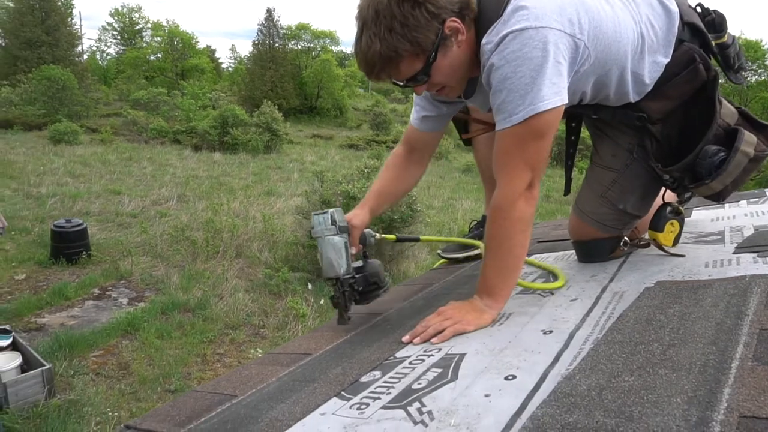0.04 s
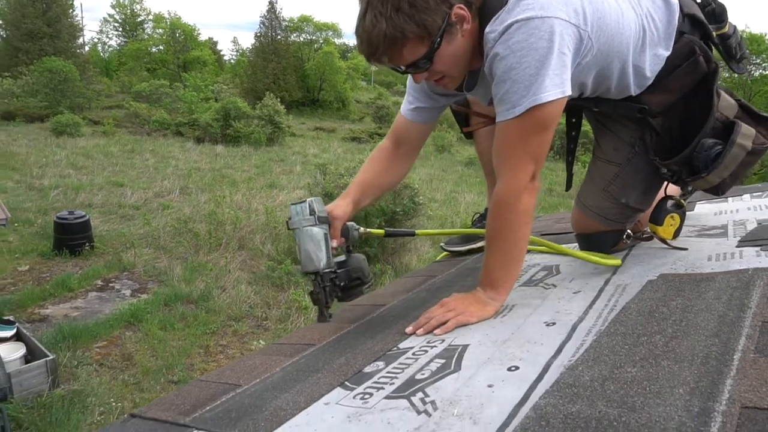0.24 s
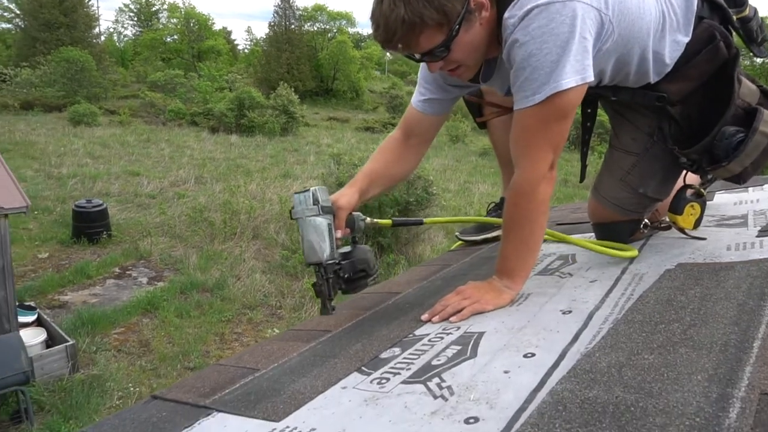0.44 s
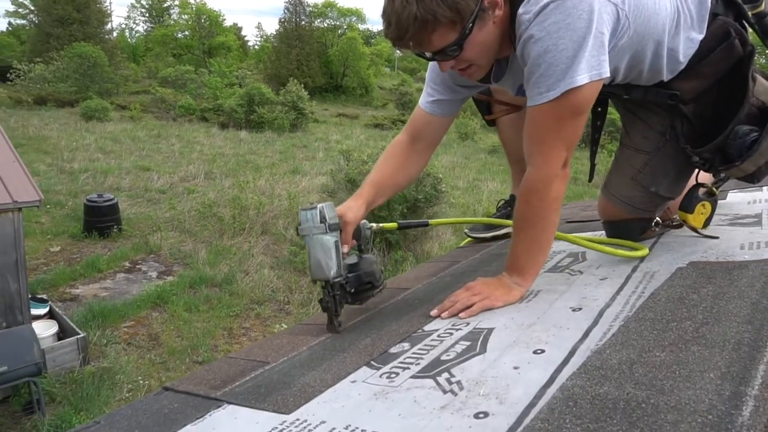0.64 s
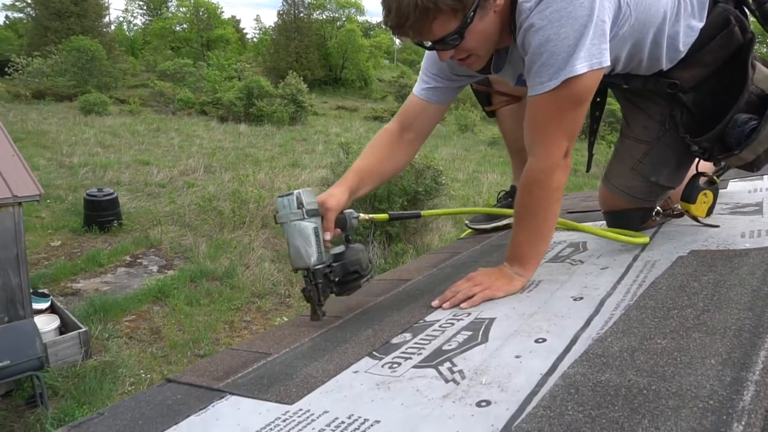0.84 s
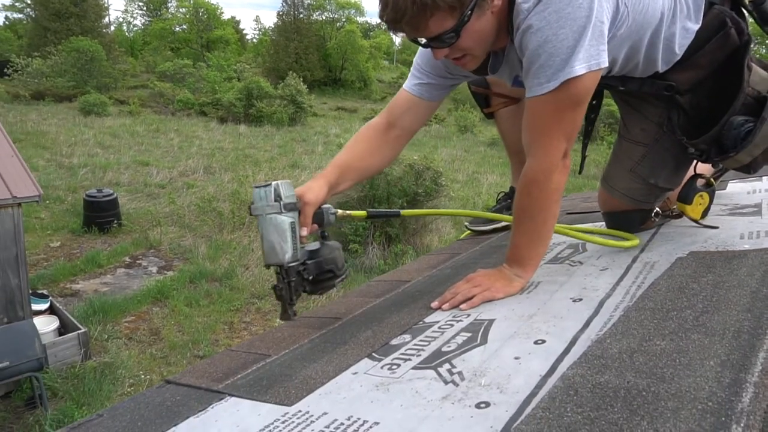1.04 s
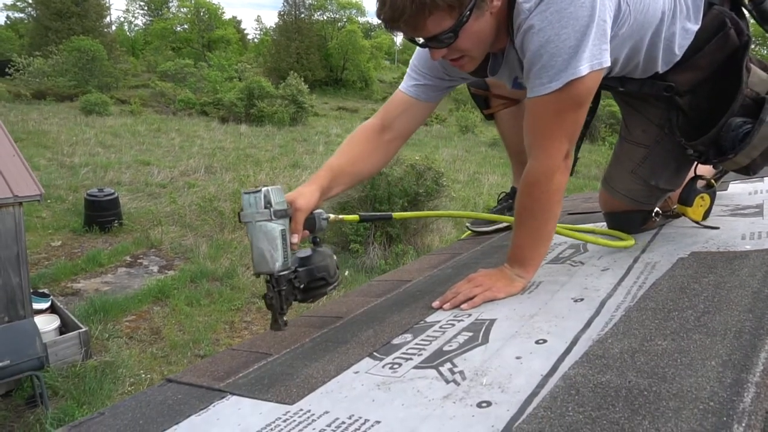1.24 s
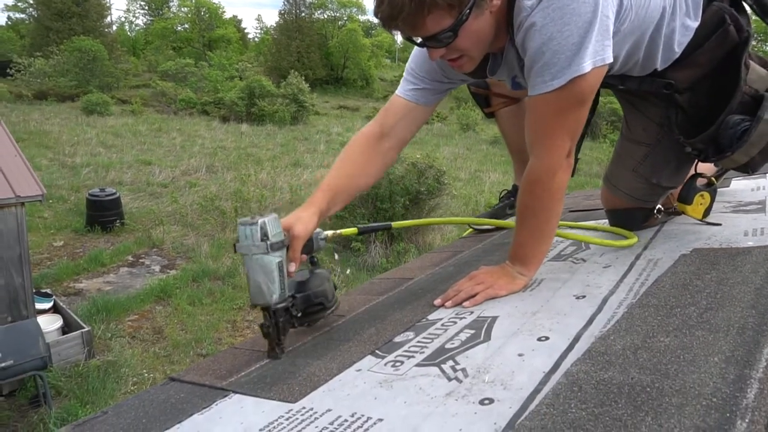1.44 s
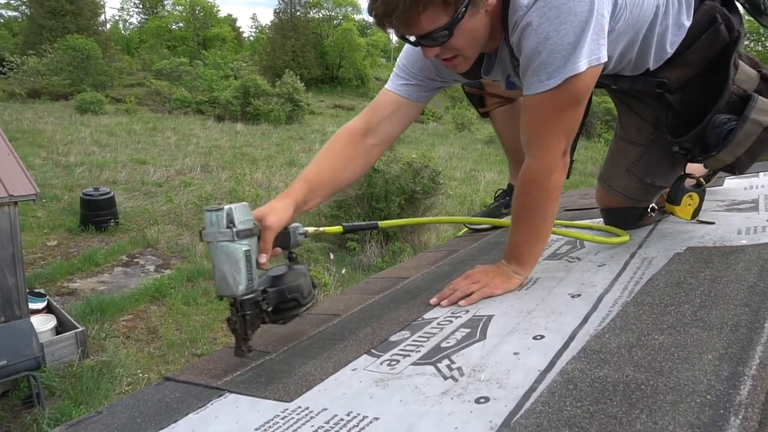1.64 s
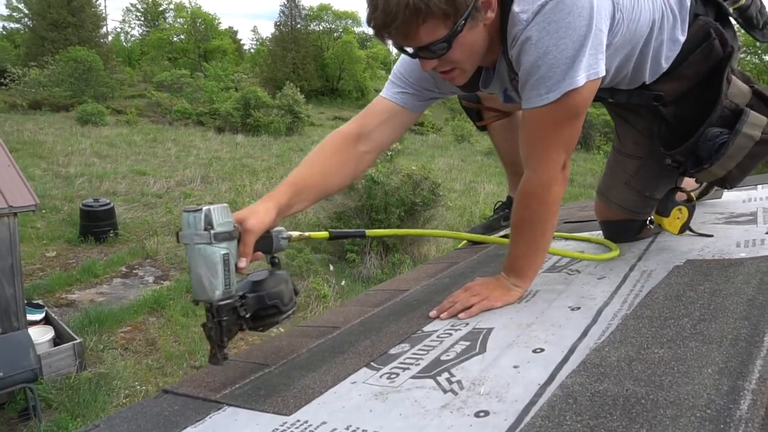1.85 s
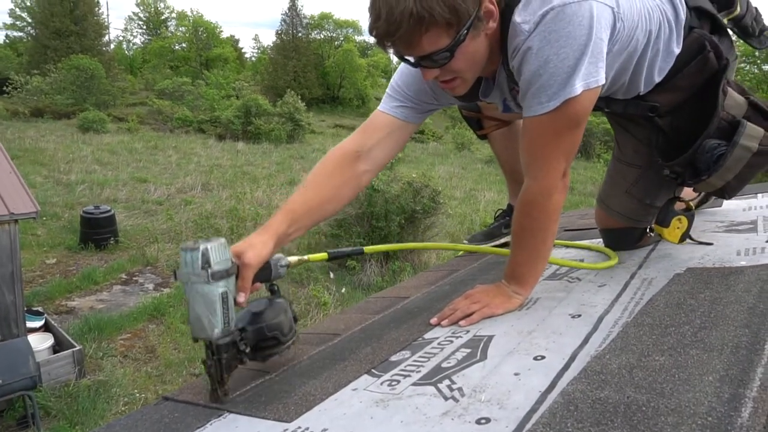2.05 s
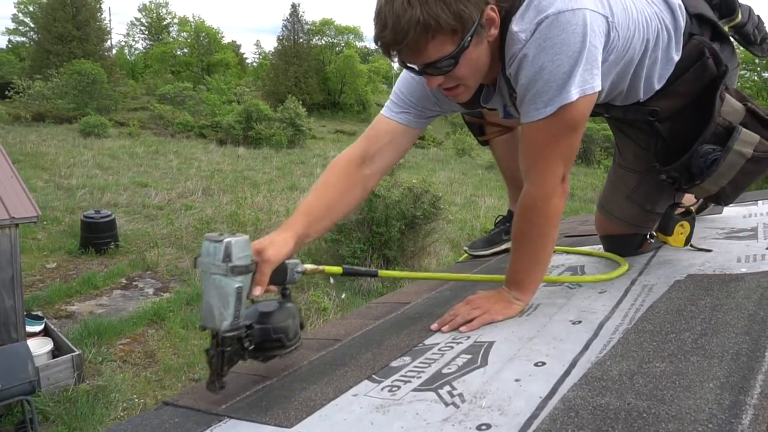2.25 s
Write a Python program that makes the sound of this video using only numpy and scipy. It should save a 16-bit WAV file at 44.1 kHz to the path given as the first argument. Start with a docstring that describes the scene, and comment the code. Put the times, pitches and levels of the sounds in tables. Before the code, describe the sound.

A pneumatic nail gun works close by on an outdoor roof. It opens on the exhaust hiss of a shot just fired, then a brief gritty scrape with soft bumps around 0.2 seconds. Sharp, clacking bangs land at about 0.8, 1.5 and 2.2 seconds, each followed by a short air hiss. Wind rumbles from 1 to 1.5 seconds, small clicks come near 1.3, and a distant motor hums faintly.

```python
"""Coil nailer on a roof

A pneumatic nailer tacks shingles to a wooden deck, close up and outdoors. Each shot is a trigger tick,
the nose's thud, air into the cylinder, a steel clack and a nail blow that overloads the microphone;
then the piston returns with a spit of air and the exhaust hiss swells and falls. Between shots come
a scrape, soft bumps, grit and small clicks, over wind and a distant motor."""
import sys
import numpy as np
from scipy import signal
from scipy.fft import rfft, irfft, next_fast_len
from scipy.io import wavfile
from scipy.ndimage import uniform_filter1d

SR = 44100
rng = np.random.default_rng(int(sys.argv[2]) if len(sys.argv) > 2 else 0)


def digitize_waveform(pressure):
    """Quantize a signal to 16-bit integers and store it at the path in sys.argv[1].

    Rows of a 2-D input are taken as channels; values are limited to [-1, 1].
    """
    field = np.atleast_2d(pressure).T
    bounded = np.clip(field, -1, 1)
    quanta = np.round(bounded * 32767).astype(np.int16)
    wavfile.write(sys.argv[1], SR, quanta)


N = 101297
T = np.arange(N) / SR

# The shots. Each row: time of the blow in seconds, piston return in seconds after it, knock pitch in Hz,
# trims in dB for blow, steel ring, deck and exhaust, nose thud pitch in Hz, nose thud level in dB.
SHOTS = [(-.06, 0.04, 1140, 0, -1, -11, 2, 212, -20), (0.7555, 0.023, 924, -3, -25, 0, 0.5, 293, -9),
         (1.5339, .0277, 1462, -6.5, 4, -5, 2, 251, -21.5),
         (2.150, 0.024, 1380, -6, 1.5, -2.5, 0, 117, -16)]
# Modes of the steel driver and the roof deck. Each row: pitch in Hz, level in dB, T60 in seconds.
DRIVER_MODES = [(5060, -3.5, 0.014)]
DECK_MODES = [(76.46, -18, 0.83), (183.5, -24.5, 0.86), (228.4, -27, 0.67), (297, -17, 0.091),
              (430, -40, 0.39), (567, -25.5, 0.26), (816, -12.5, 0.083)]
# EQ curves for the noise layers. Each row: frequency in Hz, relative level in dB.
BLOW_EQ = [(100, -2), (300, -2), (800, 0), (2400, -7.5), (4000, -10), (16000, -23)]
VALVE_EQ = [(40, -52), (120, 8), (400, 1), (850, 0.5), (2000, -7.5), (6500, -11.5), (8700, -5),
            (10300, -26), (13400, -8), (16000, -30)]
CLACK_EQ = [(200, -3), (8600, -11), (11000, -15.5), (16000, -36)]
RATTLE_EQ = [(350, 4), (1170, -12.5), (1870, -1.5), (2930, -14), (3940, -7), (6000, -7), (9000, -11),
             (10500, -16)]
SPIT_EQ = [(100, -14), (250, 5), (1140, -17.5), (1940, -3.5), (2860, -11), (4120, -0.5), (6600, -5.5),
           (8740, 3), (9750, -6), (14000, -3.5), (16000, -10.5)]
HISS_EQ = [(30, -40), (80, 5), (250, -3.5), (370, -1), (553, -11.5), (790, -4), (1110, -13.5),
           (2900, -14.5), (4100, -11), (6900, -13), (8700, -7.5), (10300, -22), (13300, -16), (16000, -28)]
CLICK_EQ = [(600, -21), (1300, -2), (2100, -3), (2500, 8), (3000, -8.5), (8000, -17.5), (12000, -28)]
GRIT_EQ = [(300, -5), (4500, 0.5), (8500, 2), (10300, -4.5), (15000, -11.5)]
BUMP_EQ = [(20, 2), (90, -3.5), (300, -5), (1500, -61)]
WIND_EQ = [(3, 6), (14, -3), (40, -16.5), (160, -44), (2000, -100)]
FIELD_EQ = [(40, -13.5), (104, -1.5), (135, -14), (330, -17), (700, -21), (1500, -23), (3000, -30),
            (9000, -36), (10600, -56), (13800, -40), (16000, -71)]
# Whistles of the exhaust port. Each row: start in seconds, length in seconds, pitch in Hz, level in dB.
PORT_WHISTLES = [(2.242, 0.025, 2450, -25.5), (2.275, 0.0066, 2520, -21.5)]
# Decay of the yard's echo. Each row: frequency in Hz, T60 in seconds.
YARD_DECAY = [(150, 0.61), (400, 0.47), (1400, 0.71), (4000, 0.4), (12000, 0.26)]
# Knees and hands on the deck. Each row: start in seconds, level in dB.
DECK_BUMPS = [(0.156, -23.5), (0.194, -28), (0.236, -24), (1.176, -31)]
# Clicks of the trigger and nose. Each row: start in seconds, level in dB, decay in seconds.
TOOL_CLICKS = [(1.2426, -31, 0.00096), (1.2532, -35.5, 0.0013), (1.2735, -32.5, 0.0022),
               (1.28, -37.5, 0.00099), (1.2838, -25.5, 0.0015), (1.9781, -28.5, 0.002)]
# Fader moves for the gritty rustle and the wind. Each row: time in seconds, level in dB.
RUSTLE_FADER = [(.3, -54), (.62, -61.5), (.97, -51), (1.19, -52.5), (1.33, -64), (1.84, -51), (2.1, -59.5)]
WIND_FADER = [(0, -23), (.6, -30), (1.02, -14), (1.18, -12.5), (1.32, -2.5), (1.39, -16), (1.46, -7.5),
              (1.6, -24.5), (2.3, -22.5)]
# Tones of the distant motor. Each row: pitch in Hz, starting level in dB, fade in dB per second.
MOTOR_TONES = [(102, -49, 0), (678, -50, 10)]

TRIGGER_LEAD_S, VALVE_LEAD_S, CLACK_LEAD_S, NAIL_LEAD_S = .0285, .024, .0088, .002  # ahead of the blow
SWELL_END_S, FALL_FROM_S, SWELL_DB_PER_S = 0.086, 0.12, 258  # exhaust, timed from the blow
HISS_FALL_DB_PER_S, BODY_FALL_DB_PER_S, PORT_FALL_DB_PER_S, JET_FALL_DB_PER_S = 351, 138, 341, 211
BODY_HZ, PORT_HZ, PORT_WIDTH_HZ = 287, 4870, 450
JET_HZ, JET_WIDTH_HZ, SAG_FROM_S, SAG_HZ_PER_S = 4570, 2300, 0.09, 12000
OVERLOAD, LIMIT_DB, LIMIT_S = 0.86, 14, 0.009
LOW_CUT_HZ, HIGH_CUT_HZ = 7, 15950


def amp(db):
    """Decibels to gain."""
    return 10 ** (np.asarray(db) / 20)


def unit(x):
    """Scales to rms 1."""
    return x / np.sqrt(np.mean(x ** 2) + 1e-20)


def curve_at(points, hz):
    """Reads a curve on a log-frequency axis."""
    point_hz, value = np.transpose(points)
    return np.interp(np.log(hz + 1), np.log(point_hz + 1), value)


def equalise(x, eq):
    """Shapes a signal with an EQ curve, at rms 1."""
    size = next_fast_len(N)
    gain = amp(curve_at(eq, np.fft.rfftfreq(size, 1 / SR)))
    return unit(irfft(rfft(x, size) * gain, size)[:N])


def noise(eq):
    """Coloured noise at rms 1."""
    return equalise(rng.standard_normal(N), eq)


def waver(span_s):
    """Random drift at rms 1, smooth over span_s."""
    size = max(int(span_s * SR), 1)
    return unit(uniform_filter1d(uniform_filter1d(rng.standard_normal(N), size), size))


def crackle(per_s, spread_db):
    """Randomly scattered clicks of uneven size."""
    sizes = rng.standard_normal(N) * amp(spread_db * np.minimum(rng.exponential(1, N), 3))
    return sizes * (rng.random(N) < per_s / SR)


def gate(t, attack_s, hold_s, decay_s):
    """Linear attack from t = 0, exponential release from t = hold_s."""
    return np.clip(t / attack_s, 0, 1) * np.exp(-np.clip((t - hold_s) / decay_s, 0, 50))


def ring(t, modes):
    """Modes (Hz, dB, T60 in seconds) struck at t = 0, each slightly detuned at random."""
    live, out = (t > 0) & (t < 1), np.zeros(N)
    age = t[live]
    for hz, db, t60 in modes:
        cycles = hz * rng.uniform(.99, 1.01) * age + rng.random()
        out[live] += amp(db - 60 * age / t60) * np.sin(2 * np.pi * cycles)
    return out


def push(t, width_s):
    """One smooth pulse of pressure."""
    age = np.clip(t / width_s, 0, 50)
    return age * np.exp(1 - age)


def resonate(x, hz, width_hz):
    """A resonant band around hz, steady or sweeping."""
    carrier = np.exp(2j * np.pi * np.cumsum(np.full(N, hz)) / SR)
    pole = np.exp(-np.pi * width_hz / SR)
    return (carrier * signal.lfilter([(1 - pole) ** 2], [1, -2 * pole, pole * pole], x / carrier)).real


def nail_blow(t, knock_hz, blow_db, deck_db):
    """The nail snaps off its coil and drives home: the board knocks, deck booms, magazine rattles."""
    snap = amp(-11.5) * noise(SPIT_EQ) * gate(t + NAIL_LEAD_S, 0.00026, 0.00067, 0.0004)
    knock = ring(t, [(knock_hz, 9, 0.017)])
    crack = amp(3.5) * noise(BLOW_EQ) * gate(t, 0.0001, 0.0034, 0.0021)
    punch = amp(-1) * push(t, width_s=.003)
    rattle = amp(-18.5) * noise(RATTLE_EQ) * amp(7.6 * waver(0.00076)) * gate(t, 0.0047, 0.017, 0.0059)
    boom = amp(deck_db) * ring(t, DECK_MODES) * np.clip(t / 0.002, 0, 1)
    return snap + amp(blow_db) * (knock + crack + punch) + rattle + boom


def firing(t, ring_db):
    """The trigger ticks, air fills the cylinder and the steel driver clacks and rings."""
    tick = amp(-16) * noise(RATTLE_EQ) * gate(t + TRIGGER_LEAD_S, 0.00007, 0.000094, 0.0031)
    air = amp(-14.5) * noise(VALVE_EQ) * gate(t + VALVE_LEAD_S, 0.0026, 0.0125, 0.0028)
    clack = amp(-2) * noise(CLACK_EQ) * gate(t + CLACK_LEAD_S, 0.000067, 0.00082, 0.00099)
    return tick + air + clack + amp(ring_db) * ring(t + CLACK_LEAD_S, DRIVER_MODES)


def nose_thud(t, hz, db):
    """The nose lands on the shingle; the board's pitch depends on the spot."""
    age = t + VALVE_LEAD_S
    return ring(age, [(hz, db, 0.09)]) * np.clip(age / 0.0011, 0, 1)


def piston_return(t):
    """The piston flies back: a hollow thud, a bright spit of air, and a knock as it seats."""
    thud = ring(t, [(384, -5.5, 0.024)]) - amp(-9) * push(t, width_s=.0007)
    seat = amp(-14) * noise(BLOW_EQ) * gate(t - .017, 0.0009, 0.0021, 0.0022)
    spit = amp(-13) * noise(SPIT_EQ) * gate(t - .001, 0.00042, 0.014, 0.0086)
    return thud + seat + spit


def exhaust(t):
    """Spent air swells out of the ringing port; the jet's hiss sinks in pitch as pressure runs out."""
    swell_db = SWELL_DB_PER_S * np.minimum(t - SWELL_END_S, 0)
    fall_s = np.maximum(t - FALL_FROM_S, 0)
    jet_hz = JET_HZ - SAG_HZ_PER_S * np.clip(t - SAG_FROM_S, 0, .1)
    jet = resonate(rng.standard_normal(N), jet_hz, JET_WIDTH_HZ)
    jet = unit(resonate(jet, jet_hz, JET_WIDTH_HZ))
    jet *= amp(-22.5 - JET_FALL_DB_PER_S * fall_s) * gate(t, 0.23, 0.19, 0.017)
    port = unit(resonate(rng.standard_normal(N), PORT_HZ, PORT_WIDTH_HZ))
    port *= amp(-29.5 - PORT_FALL_DB_PER_S * fall_s)
    # Split the rush of air so its top end dies first and its body lingers.
    air = amp(-19) * noise(HISS_EQ)
    lows = signal.sosfiltfilt(signal.butter(2, BODY_HZ, fs=SR, output="sos"), air)
    hiss = (air - lows) * amp(-HISS_FALL_DB_PER_S * fall_s)
    body = lows * amp(-BODY_FALL_DB_PER_S * fall_s)
    return (hiss + body + port + jet) * amp(swell_db + waver(0.0023)) * np.clip(t / 0.034, 0, 1)


def whistles():
    """On the last shot the escaping air catches an edge and whistles roughly."""
    out = np.zeros(N)
    for start, length, hz, db in PORT_WHISTLES:
        tone = unit(resonate(rng.standard_normal(N), hz, width_hz=320))
        out += amp(db) * tone * gate(T - start, 0.0018, length, 0.0022)
    return out


def yard_echo(x):
    """A scattered echo from the roof, sheds and trees."""
    hz, t, spectrum = signal.stft(rng.standard_normal(SR), SR, nperseg=256)
    decay = amp(-60 * t / curve_at(YARD_DECAY, hz)[:, None])
    fade_in = np.clip(t / 0.089, 0, 1)
    tail = signal.istft(spectrum * decay * fade_in, SR, nperseg=256)[1]
    return signal.fftconvolve(x, tail / np.linalg.norm(tail))[:N]


def scrape():
    """Something drags briefly over the gritty shingles and stops short."""
    grains = equalise(crackle(per_s=6000, spread_db=0.88), HISS_EQ)
    stroke = gate(T - .085, .015, .165, .011)
    return grains * amp(-30.5 + 2 * waver(0.015)) * stroke


def bumps():
    """Dull bumps on the deck as the roofer shifts his weight."""
    return noise(BUMP_EQ) * sum(amp(db) * push(T - start, 0.0051) for start, db in DECK_BUMPS)


def tool_clicks():
    """The trigger and nose click as the nailer is lifted and moved."""
    envelope = sum(amp(db) * gate(T - start, 0.0002, 0.00074, decay) for start, db, decay in TOOL_CLICKS)
    return noise(CLICK_EQ) * envelope


def grit():
    """Grit crunches on the roof as the roofer moves."""
    grains = equalise(crackle(per_s=900, spread_db=3.5), GRIT_EQ)
    return grains * amp(np.interp(T, *np.transpose(RUSTLE_FADER)) + 2 * waver(0.026))


def wind():
    """Gusts rumble on the microphone."""
    return noise(WIND_EQ) * amp(np.interp(T, *np.transpose(WIND_FADER)))


def field():
    """A quiet, wavering bed of rustle from the field."""
    return noise(FIELD_EQ) * amp(-48 + waver(0.044))


def motor_hum():
    """A distant motor hums on two wavering tones; the upper one fades away."""
    hum = np.zeros(N)
    for hz, db, fade_db_per_s in MOTOR_TONES:
        level = amp(db - fade_db_per_s * T + 1.2 * waver(0.045))
        hum += level * unit(np.sin(2 * np.pi * hz * T + 0.69 * waver(0.018)))
    return hum


def scene():
    """The mono mix: the shots and their faint echo, over the roof foley and outdoor ambience."""
    nailer = whistles()
    for blow_s, return_s, knock_hz, blow_db, ring_db, deck_db, exhaust_db, nose_hz, nose_db in SHOTS:
        t = T - blow_s
        nailer += nose_thud(t, nose_hz, nose_db) + firing(t, ring_db)
        nailer += nail_blow(t, knock_hz, blow_db, deck_db)
        nailer += piston_return(t - return_s) + amp(exhaust_db) * exhaust(t)
    echo = amp(-23.5) * yard_echo(nailer)
    foley = scrape() + bumps() + tool_clicks() + grit()
    ambience = field() + motor_hum() + wind()
    return (nailer + echo + foley + ambience)[None]


def record(dry):
    """The microphone overloads on each blow and a limiter briefly ducks it; then low and high cuts."""
    clipped = dry / (1 + (dry / OVERLOAD) ** 8) ** (1 / 8)
    smoothing = np.exp(-1 / (LIMIT_S * SR))
    overload_share = signal.lfilter([1 - smoothing], [1, -smoothing], abs(dry) > OVERLOAD)
    ducked = clipped * amp(-LIMIT_DB * overload_share)
    high_passed = signal.lfilter(*signal.butter(1, LOW_CUT_HZ, "high", fs=SR), ducked)
    high_cut = signal.firwin(401, HIGH_CUT_HZ, window=("kaiser", 9), fs=SR)
    return signal.oaconvolve(high_passed, high_cut[None], "same")


dry = scene()
out = record(dry)
digitize_waveform(out)
```